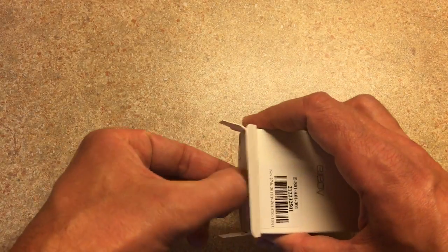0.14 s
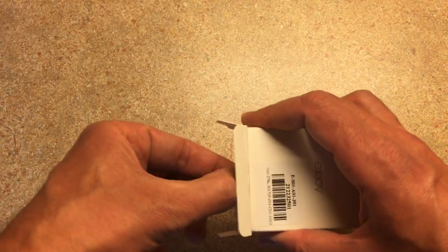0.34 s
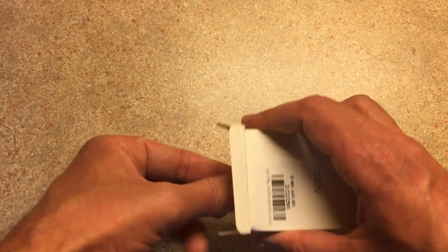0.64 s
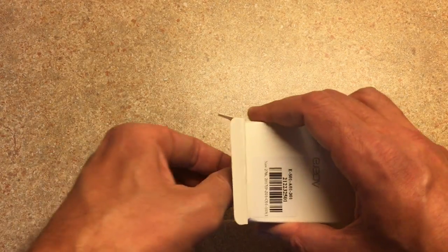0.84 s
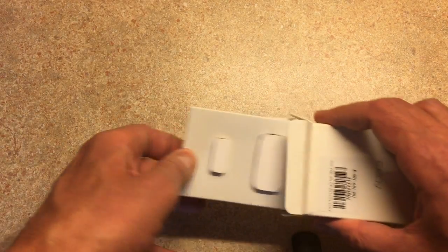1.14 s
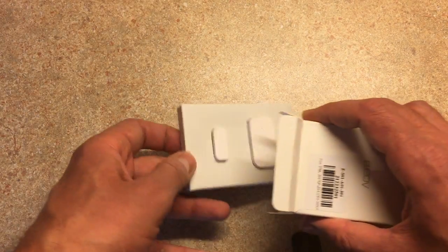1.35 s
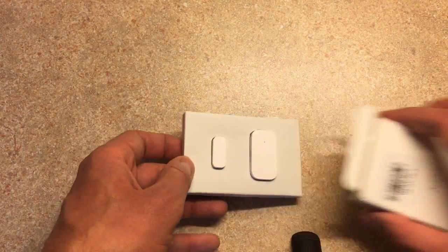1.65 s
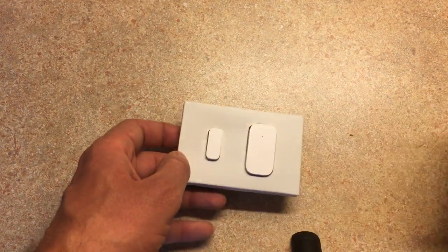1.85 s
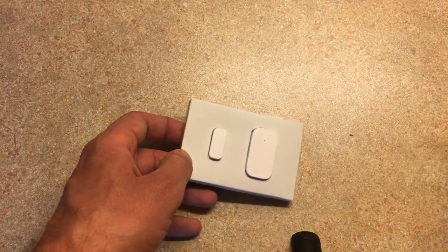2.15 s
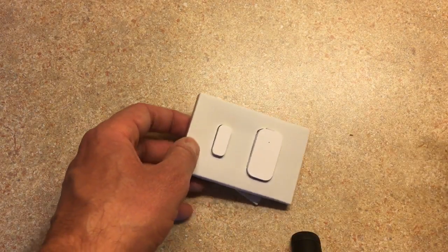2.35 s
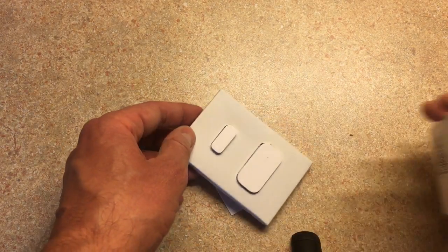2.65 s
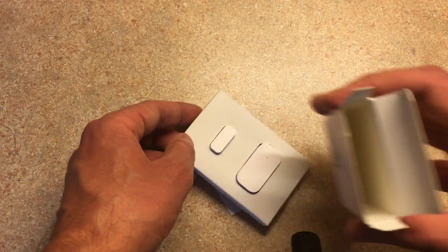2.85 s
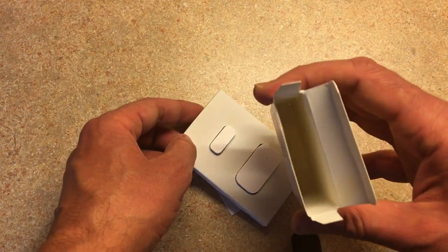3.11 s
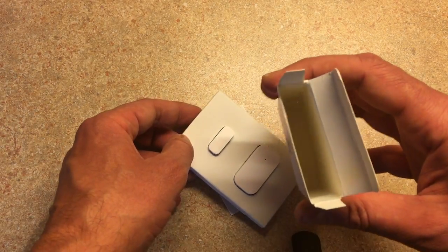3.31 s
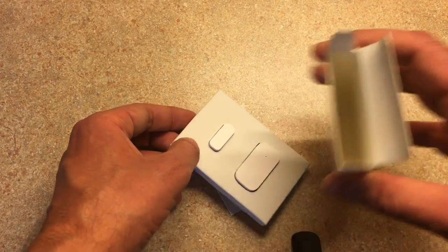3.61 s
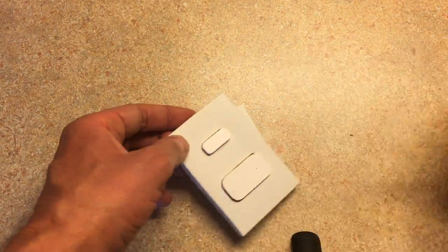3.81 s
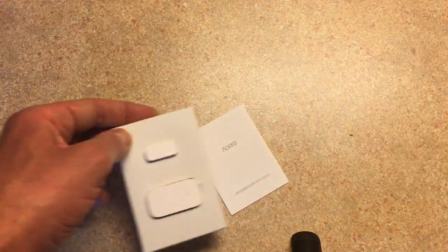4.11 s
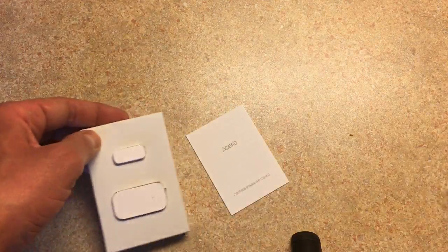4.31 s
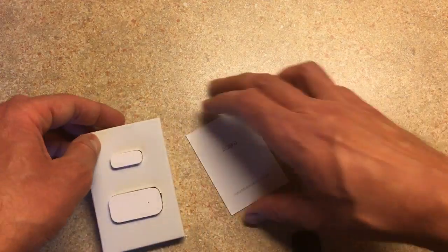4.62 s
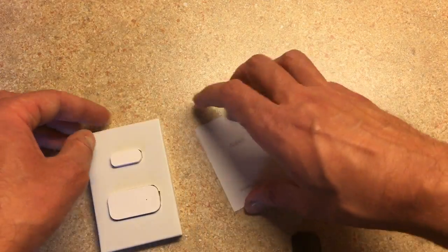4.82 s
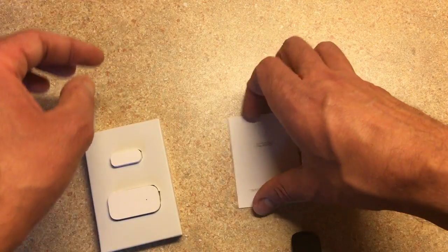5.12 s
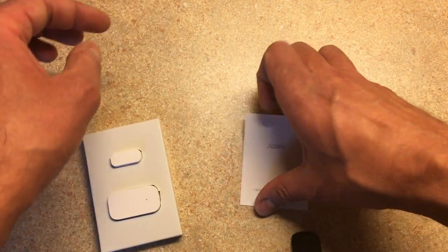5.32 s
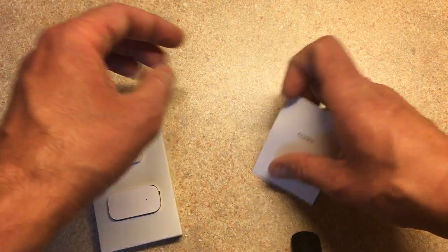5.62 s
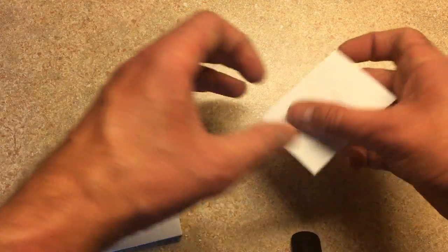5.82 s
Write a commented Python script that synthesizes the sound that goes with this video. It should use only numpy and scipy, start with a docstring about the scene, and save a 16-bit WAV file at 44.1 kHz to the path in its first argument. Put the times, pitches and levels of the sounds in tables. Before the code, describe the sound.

Close up in a small room with a low electrical hum, hands work a little cardboard box open. The flap rasps, the inner tray scrapes free, and card knocks hollowly on card. Fingers shift faintly for a while. Then come more taps and soft bumps on a desk, the whisper of a paper leaflet sliding, and one loud, bright paper snap followed by smaller flicks.

```python
"""A card tray slides out of a small cardboard box; the hands then drag a folded leaflet over and lift it.
Friction of skin, card and paper gives a fine hiss. Impacts excite the damped modes of the card, which
knocks hollowly, and of the desk under the fingers. Bent paper edges snap free, once loudly.
One close microphone hears this in a small reverberant room with a low mains hum."""
import sys
import numpy as np
from scipy import signal
from scipy.fft import rfft, irfft
from scipy.io import wavfile
from scipy.ndimage import uniform_filter1d

SR = 44100
rng = np.random.default_rng(int(sys.argv[2]) if len(sys.argv) > 2 else 0)


def pcm_store(signal):
    """Save signal as 16-bit PCM."""
    levels = np.round(np.clip(np.atleast_2d(signal), -1, 1) * 32767)
    wavfile.write(sys.argv[1], SR, levels.astype(np.int16).T)


N = 262832
TIME = np.arange(N) / SR

# spectrum of the room's steady air: (frequency [Hz], relative level [dB])
AIR_SPECTRUM = [(25, -20), (80, -12.5), (105, -19.5), (150, -14.5), (220, -24.5), (270, -26), (335, -20.5),
                (480, -30.5), (1150, -25), (1500, -29.5), (2200, -35), (3500, -43), (9000, -47.5),
                (17000, -52)]
# reverberation time of the room: (frequency [Hz], T60 [s])
ROOM_T60 = [(100, 0.39), (500, 0.38), (1500, 0.51), (4000, 0.37), (10000, 0.22)]
# early reflections: (delay [s], gain [ratio])
REFLECTIONS = [(.0033, 0.1), (.0092, 0.046)]

# modes of the desk top and of the end flap: (frequency [Hz], bandwidth [Hz], relative level [dB])
DESK_MODES = [(143, 61, -15), (258, 110, -6.5), (341, 58, 9), (535, 68, -5), (706, 310, -8)]
FLAP_MODES = [(1070, 210, -9), (2380, 450, -4.5), (5980, 730, -11.5)]
# modes of the card when centred on CARD_CENTRE_HZ: (frequency [Hz], relative level [dB], T60 [s])
CARD_MODES = [(884, -20.5, 0.0093), (1177, 3, 0.024), (1490, -8, 0.02), (1397, 4, 0.0093),
              (1756, -4.5, 0.034), (1820, -36, 0.0017), (2284, -2, 0.0081)]

# impact spectra: (frequency [Hz], relative level [dB])
THUMP_SPECTRUM = [(40, -23), (85, -4), (150, 1), (200, -7.5), (290, -9), (450, -26), (1500, -58)]  # soft landing on the desk
THUD_SPECTRUM = [(40, -33), (90, 2.5), (170, -6), (330, -12.5), (430, -7), (620, 4.5), (850, 1),
                 (1200, -5.5), (3000, -79.5)]  # card striking the desk
CLACK_SPECTRUM = [(300, -53), (800, -10), (1200, 1), (1900, 9.5), (2600, -2), (4000, -16.5), (9000, -48.5)]  # the card's many heavily damped modes
TICK_SPECTRUM = [(900, -45.5), (2000, 2.5), (2800, -3), (4500, -8.5), (6000, -10), (8800, -16.5),
                 (10500, -22), (17000, -31)]  # point of contact
SNAP_SPECTRUM = [(100, -10), (800, -14.5), (1300, -5), (2100, 0), (3000, -2), (4600, 1), (6500, -1),
                 (9000, -6), (10500, -7.5), (13500, -7), (17000, -15.5)]  # paper edge
# friction spectra: (frequency [Hz], relative level [dB])
HISS_SPECTRUM = [(400, -63), (1500, -20.5), (2600, -4), (3600, -0.5), (5000, -3.5), (6500, -2.5),
                 (9000, -4), (10300, -7), (12000, -5.5), (17000, -14.5)]  # rubbed surface
BODY_SPECTRUM = [(60, -13), (200, -14), (450, -0.5), (650, -1), (950, -3), (1250, 3), (1600, -0.5),
                 (2200, 1.5), (3200, -12.5), (8000, -38)]  # the card or paper beneath it
SCRAPE_SPECTRUM = [(400, -39), (1400, -15), (2400, -5), (2950, -5), (3900, 1.5), (5200, -1), (6500, -1),
                   (9000, -5), (10400, -9), (12500, -10), (17000, -20)]  # card on card
SLEEVE_SPECTRUM = [(60, -8), (250, -11), (480, -14.5), (800, -6.5), (1130, -3.5), (1400, -4), (1700, 2.5),
                   (2300, -8), (3200, -24), (8000, -22)]  # the open sleeve of the box

# fingertips and card landing on the desk: (time [s], ring level [dB], thump level [dB])
BUMPS = [(0.207, -63, -58), (1.42, -57.5, -54), (1.5, -72, -55.5), (3.545, -60.5, -63),
         (4.259, -56.5, -48.5), (4.66, -62, -56.5), (4.728, -56, -69), (4.867, -52.5, -50.5),
         (4.92, -55, -55.5), (5.078, -48, -72), (5.136, -51, -57), (5.227, -50.5, -57), (5.351, -50.5, -55)]
# moves of the leaflet: (start [s], duration [s], hiss level [dB], paper level [dB], desk level [dB])
DRAGS = [(4.662, 0.19, -66, -62, -60.5), (4.91, 0.12, -67, -70, -55.5), (5.084, 0.01, -78, -56, -46),
         (5.13, 0.19, -72.5, -71, -76), (5.33, 0.22, -64.5, -80, -72.5), (5.534, 0.19, -61, -66.5, -73.5),
         (5.93, 0.013, -70, -95, -100)]
# paper edges flicking free: (time [s], level [dB])
SNAPS = [(0.04, -45.5), (0.128, -66.5), (0.5674, -48.5), (0.595, -47), (0.617, -44.5), (0.628, -46.5),
         (2.693, -59.5), (3.887, -55.5), (5.025, -50.5), (5.251, -58), (5.2873, -25.5), (5.2909, -31.5),
         (5.388, -48), (5.399, -52), (5.422, -41), (5.536, -57), (5.714, -58), (5.794, -50.5)]
# spells of faintly shifting fingers: (start [s], end [s], hiss level [dB], pressure [0-1])
FIDGETS = [(2.117, 2.7, -67.5, 0.42), (4.055, 4.27, -64.5, 0.69)]
# strokes of skin and card: (peak time [s], half length [s], hiss level [dB], pressure [0-1])
RUBS = [(0.008, 0.048, -50, 0.33), (0.257, 0.029, -56.5, 0.49), (0.365, 0.024, -60.5, 0.31),
        (0.492, 0.025, -54, .6), (0.6, 0.03, -54.5, 0.38), (0.847, 0.072, -66.5, 0.8),
        (0.906, 0.025, -59.5, 0.28), (1.008, 0.0077, -44, .5), (1.066, 0.015, -43.5, 0.41),
        (1.251, 0.01, -49, .55), (1.298, 0.0096, -53, 0), (1.396, 0.035, -62.5, 0),
        (1.503, 0.018, -62.5, 0.1), (1.589, 0.021, -57.5, 0.82), (1.776, 0.038, -62.5, 0.58),
        (1.936, 0.028, -57.5, 0.3), (2.053, 0.026, -57.5, 0.27), (2.298, 0.015, -61.5, 0.16),
        (2.552, 0.029, -65, 0.7), (2.912, 0.042, -64, .4), (3.527, 0.023, -66, 0.4),
        (3.657, 0.019, -59.5, 0.17), (3.865, 0.033, -62, 0.87), (3.918, 0.019, -53, 0.16),
        (4.257, 0.009, -57.5, 0.92), (4.544, 0.028, -63, 0.13), (4.758, 0.025, -59.5, 0.05),
        (4.823, 0.011, -55.5, 0.66), (4.879, 0.019, -51, 0.85), (5.112, 0.022, -52.5, 0.72),
        (5.349, 0.02, -53, 0.3), (5.401, 0.013, -47, 0.27), (5.572, 0.0094, -49, .1),
        (5.683, 0.011, -61, 0.67), (5.793, 0.0087, -53, 0.45)]
# card knocking on card and desk: (time [s], thud level [dB], card excitation [dB], tick level [dB])
KNOCKS = [(0.474, -57, -46.5, -59), (0.489, -58, -44, -64), (0.5095, -52.5, -44, -65),
          (0.547, -61, -49, -74), (0.579, -58, -49, -64), (0.671, -57, -44, -65), (0.768, -56, -46.5, -63),
          (1.023, -52, -35.5, -61), (1.302, -54, -38, -43), (1.4129, -36.5, -28, -36),
          (1.551, -41, -37.5, -49.5), (1.5855, -47, -42, -53.5), (1.592, -66, -44.5, -64),
          (1.676, -48.5, -44, -60), (1.683, -46, -39.5, -52.5), (2.028, -44, -37.5, -56),
          (2.033, -55, -37, -51.5), (3.816, -72, -57.5, -61.5), (3.856, -52, -54, -70),
          (3.869, -48, -53, -72), (4.163, -53, -59.5, -63.5), (4.2575, -49, -49, -52.5),
          (4.454, -43.5, -31.5, -45.5), (4.478, -47.5, -44, -56), (4.74, -52.5, -53.5, -70),
          (4.7741, -41, -26, -37), (4.879, -40, -35, -40), (5.134, -48.5, -66, -53),
          (5.226, -64, -62.5, -56), (5.803, -55.5, -48.5, -78)]

CARD_CENTRE_HZ = 1400
FULL_BLOW_DB, FULL_BLOW_HZ, RISE_HZ_PER_DB = -26, 1336, 3.5
SLIDE_LOOSE_S, SLIDE_CLEAR_S, SLIDE_OUT_S = 1.002, 1.186, 1.31
SLIDE_FASTEST_S, SLIDE_SWELL_S, SLIDE_BASE_SPEED = 1.126, 0.056, 0.44  # full speed is 1


def amp(db):
    """Amplitude ratio of a level in decibels."""
    return 10 ** (np.asarray(db) / 20)


def unit(x):
    """Normalisation to an rms of 1."""
    return x / np.sqrt(np.mean(x ** 2) + 1e-20)


def at_level(x, db, window_s):
    """Normalisation of a transient by the rms level of its onset."""
    onset = x[:round(window_s * SR)]
    return x * amp(db) / np.sqrt(np.mean(onset ** 2) + 1e-20)


def read(points, hz):
    """Interpolation on a logarithmic frequency axis."""
    f, value = np.transpose(points)
    return np.interp(np.log(hz + 1), np.log(f), value)


def add(mix, s, sound):
    """Superposition of a sound on the mix, from time s."""
    part = mix[max(0, round(s * SR)):][:len(sound)]
    part += sound[:len(part)]


def colour(x, spectrum, tilt_db=0, size=4096):
    """Minimum-phase filtering keeps attacks sharp; the tilt is per octave above 2 kHz."""
    hz = np.fft.rfftfreq(size, 1 / SR)
    octaves = np.log2(np.maximum(hz, 2000) / 2000)
    log_gain = np.log(amp(read(spectrum, hz) + tilt_db * octaves))
    mirrored = np.concatenate([log_gain, log_gain[-2:0:-1]])
    taps = np.fft.ifft(np.exp(np.conj(signal.hilbert(mirrored)))).real[:size // 2]
    return signal.fftconvolve(x, taps)[:len(x)]


def noise(shape):
    """Stationary noise with the magnitude spectrum shape(hz)."""
    return irfft(rfft(rng.standard_normal(N)) * shape(np.fft.rfftfreq(N, 1 / SR)), N)


def resonant_noise(modes):
    """Random excitation of resonances: each passes a band of noise."""
    return unit(noise(lambda hz: sum(amp(db) / (1 + (2 * (hz - f) / width) ** 2)
                                     for f, width, db in modes)))


def judder(depth_db, cutoff_hz):
    """Amplitude modulation by uneven sliding: a gain that wanders at random."""
    return amp(depth_db * unit(noise(lambda hz: 1 / (1 + (hz / cutoff_hz) ** 4))))


def wandering_contact(x, depth_db=2.7, frames=9, bands=4):
    """Excitation varies with position: as the contact wanders, narrow bands swell and fade."""
    spectrum = signal.stft(x, SR, nperseg=512, noverlap=384)[2]
    swell = uniform_filter1d(rng.standard_normal(spectrum.shape), frames, axis=1)
    swell = uniform_filter1d(swell, bands, axis=0)
    spectrum = spectrum * amp(depth_db * unit(swell))
    return unit(signal.istft(spectrum, SR, nperseg=512, noverlap=384)[1][:len(x)])


def friction(grains_per_s, spread_db, smooth, judder_db):
    """Stick-slip of fibres: tiny uneven clicks over smooth noise, clumped by an unsteady hand."""
    sizes = amp(spread_db * np.minimum(rng.exponential(1, N), 4)) * rng.choice([-1, 1], N)
    grains = unit(sizes * (rng.random(N) < grains_per_s / SR))
    hand = judder(judder_db, cutoff_hz=70)
    return wandering_contact((grains + smooth * rng.standard_normal(N)) * hand)


def impact(t, spectrum, crunch, decay_s):
    """Filtered impulse: one sharp push, then a crunch of fibres as the surfaces settle."""
    force = crunch * rng.standard_normal(len(t)) * np.exp(-(t / decay_s) ** 2)
    force[0] += 1
    return colour(force, spectrum)


def stroke_gain(start_s, end_s, rise_db_per_s, fade_db_per_s):
    """Envelope of a stroke: exponential rise up to the start, hold, exponential decay after the end."""
    early_s, late_s = np.maximum(start_s - TIME, 0), np.maximum(TIME - end_s, 0)
    return amp(-rise_db_per_s * early_s - fade_db_per_s * late_s)


def background(hum_hz=49, hum_db=-59, drone_hz=65.1, drone_db=-59.5):
    """Beating: a mains hum lies close in frequency to a low drone, under even room noise."""
    air = noise(lambda hz: amp(read(AIR_SPECTRUM, hz)))
    upper_air = signal.sosfilt(signal.butter(4, 200, "high", fs=SR, output="sos"), air)
    air = amp(-65) * air / np.std(upper_air)  # level set by the part above 200 Hz
    hum = amp(hum_db) * unit(np.sin(2 * np.pi * hum_hz * TIME))
    drone = amp(drone_db) * resonant_noise([(drone_hz, 14, 0)])  # a band 14 Hz wide
    return air + hum + drone


def room(x, tail_gain_db, size=24000):
    """Reverberation: early reflections off desk and hands, then a short diffuse tail."""
    t = np.arange(size) / SR
    hz, frame_s, spectrum = signal.stft(rng.standard_normal(size), SR, nperseg=256)
    decay = amp(-60 * frame_s / read(ROOM_T60, hz)[:, None])
    tail = signal.istft(spectrum * decay, SR, nperseg=256)[1][:size]
    tail *= 1 - np.exp(-t / 0.00077)
    bass_lift = [(150, 9.5), (1600, -2), (3500, 0.5), (10000, -1.0)]  # (frequency [Hz], gain [dB])
    response = amp(tail_gain_db) * colour(tail / np.linalg.norm(tail), bass_lift)
    for delay_s, gain in REFLECTIONS:
        add(response, delay_s, gain * signal.windows.hann(5) / 2)
    return x + signal.fftconvolve(x, response)[:N]


def desk_bumps(size=9000):
    """Free vibration of a plate: a soft landing thumps and leaves the desk top ringing."""
    out, t = np.zeros(N), np.arange(size) / SR
    hz, width, db = np.transpose(DESK_MODES)[:, :, None]
    for s, ring_db, thump_db in BUMPS:
        # broad modes start stronger and die sooner
        strength = amp(db + 5 * rng.standard_normal(hz.shape)) * np.sqrt(width)
        # the weight of the hand detunes the top a little
        loaded_hz = hz * (1 + 0.025 * rng.standard_normal(hz.shape))
        modes = strength * np.exp(-np.pi * width * t) * np.sin(2 * np.pi * loaded_hz * t)
        ring = modes.sum(0) * (1 - np.exp(-t / 0.0013))
        thump = impact(t, THUMP_SPECTRUM, crunch=0.091, decay_s=0.0093)
        add(out, s, at_level(ring, ring_db, window_s=0.02) + at_level(thump, thump_db, window_s=0.02))
    return out


def leaflet_drag():
    """Sliding friction: the leaflet whispers while fingertips stick and slip, making the desk drone."""
    hiss_gain, body_gain, desk_gain = sum(
        amp(levels_db)[:, None] * stroke_gain(s, s + length_s, rise_db_per_s=605, fade_db_per_s=271)
        for s, length_s, *levels_db in DRAGS)
    grain = friction(grains_per_s=2300, spread_db=1.0, smooth=0.88, judder_db=3.2)
    hiss = hiss_gain * unit(colour(grain, HISS_SPECTRUM, tilt_db=-1.0))
    body = body_gain * unit(colour(grain, BODY_SPECTRUM))
    drone = desk_gain * unit(judder(depth_db=4.5, cutoff_hz=22)) * resonant_noise(DESK_MODES)
    return hiss + body + drone


def paper_snaps(size=3000):
    """Sudden release of elastic energy: a bent paper edge lets go with a bright crack."""
    out, t = np.zeros(N), np.arange(size) / SR
    loudest_db = max(db for _, db in SNAPS)
    for s, db in SNAPS:
        decay_s = 0.0075 * amp(0.45 * (db - loudest_db))  # a stronger snap shakes the sheet longer
        crack = impact(t, SNAP_SPECTRUM, crunch=1.0, decay_s=decay_s)
        add(out, s, at_level(crack, db, window_s=0.006))
    return out


def fidgets(gap_s=0.0665, half_s=0.021, spread_db=3):
    """Quasi-periodic motion: shifting fingers make faint strokes, given as rows like those of RUBS."""
    rows = []
    for start_s, end_s, hiss_db, pressure in FIDGETS:
        for s in np.arange(start_s, end_s, gap_s):
            late, louder = rng.standard_normal(2)
            rows.append((s + 0.31 * gap_s * late, half_s, hiss_db + spread_db * louder, pressure))
    return rows


def finger_rubs():
    """Friction under load: a firmer stroke stirs the card more and has a duller hiss."""
    out = np.zeros(N)
    grain = friction(grains_per_s=5000, spread_db=1.3, smooth=0.53, judder_db=2.45)
    for s, half_s, hiss_db, pressure in RUBS + fidgets():
        near = abs(TIME - s) < 3 * half_s
        t = TIME[near] - s
        width_s = half_s * np.where(t < 0, 1, 1.09)  # the fade is a little slower than the rise
        stroke = np.exp(-0.7 * (t / width_s) ** 2)
        tilt_db = np.interp(pressure, (0, 1), (1, -10.5))
        body_db = np.interp(pressure, (0, 1), (-9.5, 9.5))
        hiss = unit(colour(grain[near], HISS_SPECTRUM, tilt_db))
        body = amp(body_db) * unit(colour(grain[near], BODY_SPECTRUM))
        out[near] += amp(hiss_db) * stroke * (hiss + body)
    return out


def chatter(x, share, span_s, count=5):
    """Rebound: loose flaps touch again within milliseconds, later touches tending to be weaker."""
    out = x.copy()
    for delay, size in zip(rng.uniform(0.156, 1, count), rng.standard_normal(count)):
        add(out, delay * span_s, share * size * np.exp(-delay) * x)
    return out


def card_knocks(size=6000):
    """Impact excitation of modes: each blow rings the card, thuds on the desk and ticks at the contact."""
    out, t = np.zeros(N), np.arange(size) / SR
    hz, db, t60 = np.transpose(CARD_MODES)[:, :, None]
    polarity = (-1) ** (np.arange(len(CARD_MODES)) // 2)
    for s, thud_db, card_db, tick_db in KNOCKS:
        # a lighter touch rings a smaller, higher part of the card and settles sooner
        centre_hz = FULL_BLOW_HZ + RISE_HZ_PER_DB * (FULL_BLOW_DB - card_db)
        settle = min(1, amp(0.4 * (card_db + 36)))
        # the grip shifts the modes, the struck spot their shares
        grip, spot = rng.standard_normal((2, len(CARD_MODES), 1))
        mode_hz = hz * centre_hz / CARD_CENTRE_HZ * (1 + 0.011 * grip)
        modes = amp(db + 2 * spot - 60 * t / t60) * np.sin(2 * np.pi * mode_hz * t)
        ring = chatter(polarity @ modes, share=0.53, span_s=0.01 * settle)
        clack = impact(t, CLACK_SPECTRUM, crunch=0.037, decay_s=0.016 * settle)
        thud = impact(t, THUD_SPECTRUM, crunch=0.16, decay_s=0.0099)
        tick = impact(t, TICK_SPECTRUM, crunch=0.71, decay_s=0.0076 * settle)
        for part, part_db in (ring, card_db - 4), (clack, card_db - 6), (thud, thud_db), (tick, tick_db):
            add(out, s, at_level(part, part_db, window_s=0.01))
    return out


def flap_rasp(start_db=-34.5, fade_db_per_s=804):
    """Friction-driven resonance: the end flap rasps out of its slot, fading as it comes free."""
    return amp(start_db - fade_db_per_s * TIME) * resonant_noise(FLAP_MODES)


def tray_slide():
    """Friction noise brightens with speed: the tray scrapes along its sleeve and makes it resonate."""
    run_s = np.maximum(TIME - SLIDE_LOOSE_S, 0)
    arch = np.exp(-((TIME - SLIDE_FASTEST_S) / SLIDE_SWELL_S) ** 2)
    speed = SLIDE_BASE_SPEED + (1 - SLIDE_BASE_SPEED) * arch
    slopes = dict(rise_db_per_s=1050, fade_db_per_s=192)
    # levels sag as less card stays in contact
    scrape_gain = amp(-39 - 26 * run_s) * stroke_gain(SLIDE_LOOSE_S, SLIDE_CLEAR_S, **slopes)
    sleeve_gain = amp(-43.5 - 51 * run_s) * stroke_gain(SLIDE_LOOSE_S, SLIDE_OUT_S, **slopes)
    grain = friction(grains_per_s=7000, spread_db=2.5, smooth=0.73, judder_db=1.0)
    dull = unit(colour(grain, SCRAPE_SPECTRUM, tilt_db=-7.0))
    bright = unit(colour(grain, SCRAPE_SPECTRUM, tilt_db=2.0))
    scrape = (1 - speed) * dull + speed * bright
    # the sleeve answers to the coarser, rarer catches
    catches = friction(grains_per_s=1500, spread_db=1.5, smooth=0.64, judder_db=1.1)
    return scrape_gain * scrape + sleeve_gain * unit(colour(catches, SLEEVE_SPECTRUM))


def scene():
    """Superposition: all the handling reverberates in the room, over the steady background."""
    impacts = card_knocks() + desk_bumps() + paper_snaps()
    rubbing = finger_rubs() + flap_rasp() + tray_slide() + leaflet_drag()
    return (room(impacts + rubbing, tail_gain_db=-12) + background())[None]


def record(dry, low_hz=36, high_hz=17500):
    """Band limiting: the microphone drops the lowest rumble, the recorder the highest treble."""
    voiced = signal.sosfilt(signal.butter(4, low_hz, "high", fs=SR, output="sos"), dry)
    lowpass = signal.firwin(511, high_hz, window=("kaiser", 9), fs=SR)
    return signal.oaconvolve(voiced, lowpass[None], "same")


dry = scene()
out = record(dry)
pcm_store(out)
```